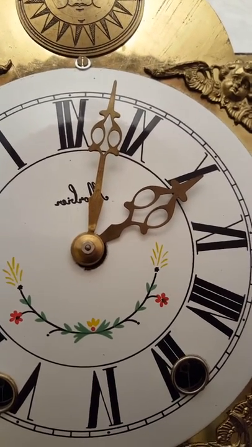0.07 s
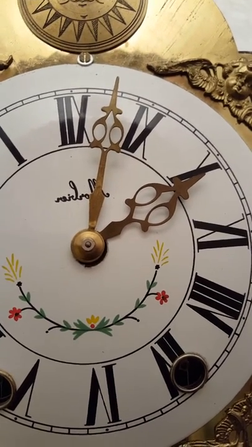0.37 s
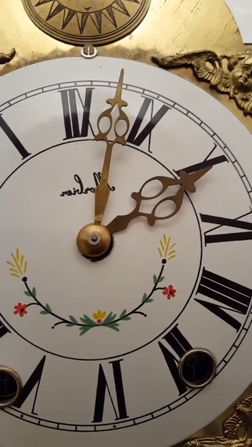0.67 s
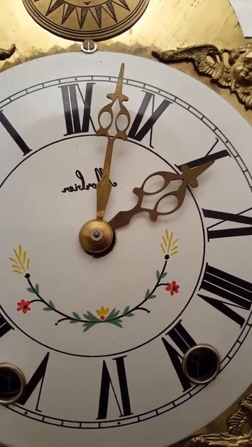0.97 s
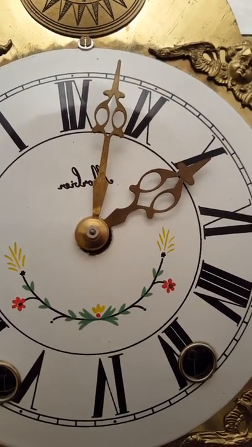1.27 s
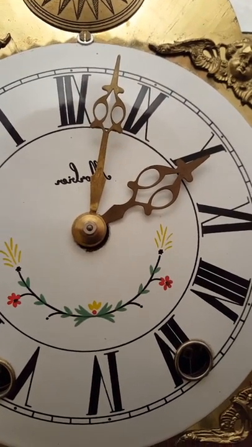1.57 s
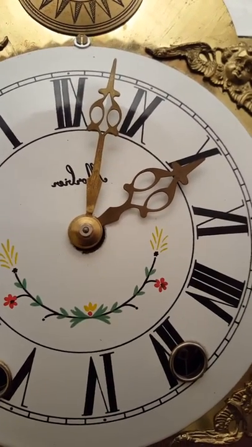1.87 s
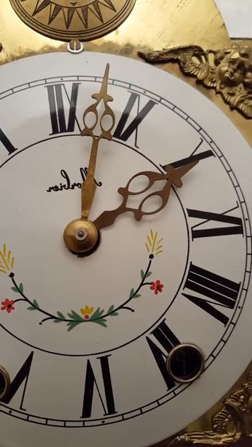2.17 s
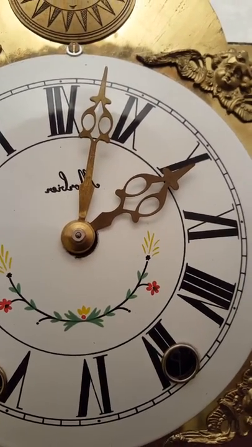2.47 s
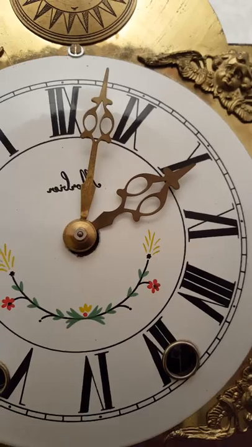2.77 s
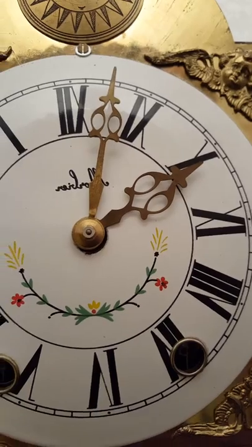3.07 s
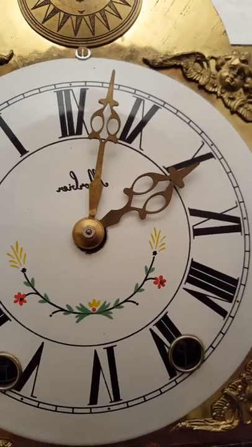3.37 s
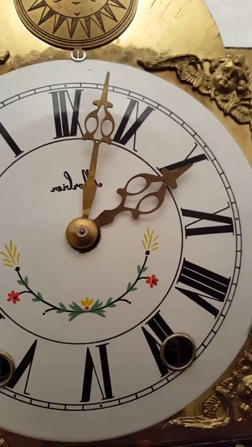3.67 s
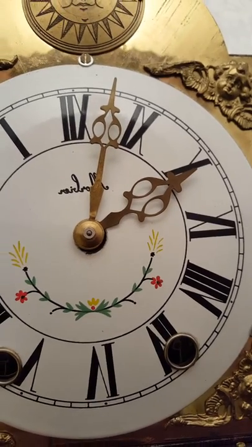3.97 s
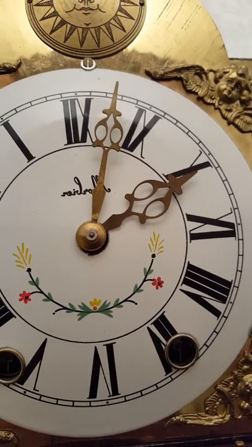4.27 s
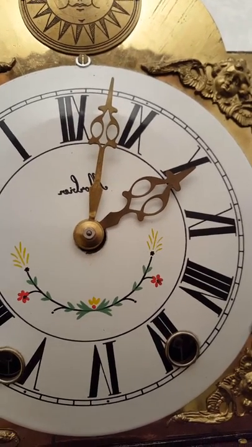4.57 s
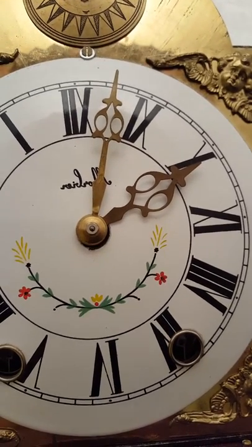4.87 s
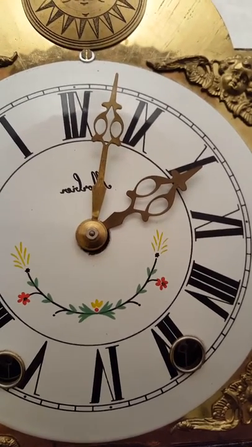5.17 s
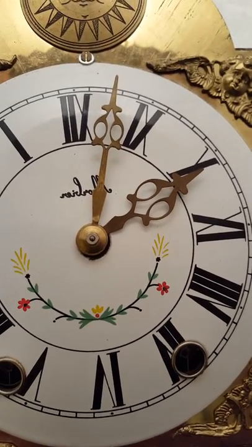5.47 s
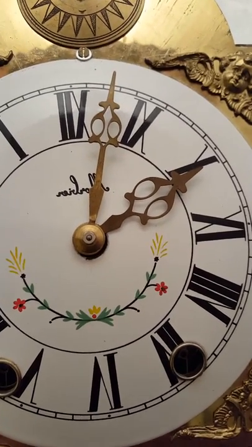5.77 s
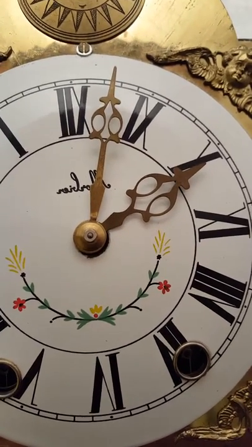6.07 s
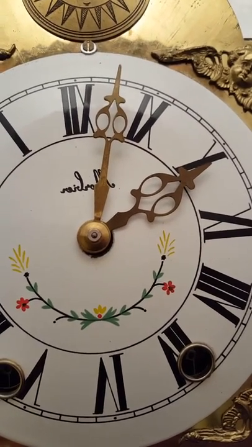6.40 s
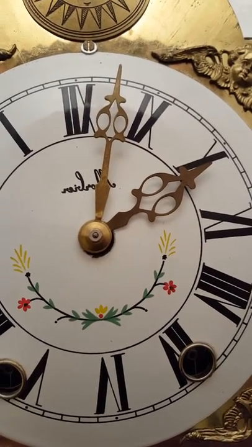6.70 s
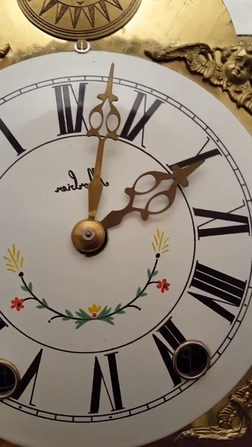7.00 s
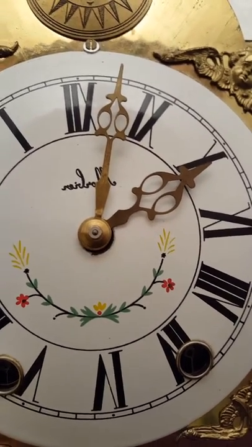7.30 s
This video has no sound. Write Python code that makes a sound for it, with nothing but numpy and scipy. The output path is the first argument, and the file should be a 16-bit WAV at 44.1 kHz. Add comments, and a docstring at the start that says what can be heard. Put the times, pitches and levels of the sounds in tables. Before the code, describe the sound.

In a quiet room with a faint rumble and hum, several mechanical clocks tick out of step. The nearest, a wall clock heard up close, beats slowly with a soft rub in its gears; behind it are a quick small clock, a hollow uneven one and a distant one. Late on, a light knock is followed by a loud rattle of metal parts as the mechanism releases, ringing briefly under the ticking.

```python
"""A pendulum wall clock ticks close by as its toothed wheel catches on two hooks in turn.
Its works rub softly around every tock, and near the end a lever lets go with a loud metal clatter.
Three other clocks tick more faintly around it, over a low room rumble and a thin hum.
Each hit is a burst of fading noise plus a few ringing tones."""
import sys
import numpy as np
from scipy import signal
from scipy.io import wavfile

SR = 44100
rng = np.random.default_rng(int(sys.argv[2]) if len(sys.argv) > 2 else 0)


def output_pcm(signal):
    """Save a mono or channel-first signal as 16-bit PCM at the path in sys.argv[1].

    Samples are clipped to [-1, 1] before scaling.
    """
    pcm = np.clip(np.atleast_2d(signal).T, -1, 1) * 32767
    wavfile.write(sys.argv[1], SR, np.round(pcm).astype(np.int16))


N = 323694
EDGES = np.geomspace(22, 17500, 39)   # borders of the frequency bands, in Hz
CENTRES = np.sqrt(EDGES[1:] * EDGES[:-1])
AGE = np.arange(int(.6 * SR)) / SR   # seconds since a hit began

# A small wooden knock before the lever lets go. Each row: start in seconds, level in dB.
KNOCK_HITS = [(6.5247, -51)]
# How hard the works stick at each tock. Each row: dB added to the rubs, dB added to the case's sway.
STICKING = [(-1, -7.5), (1, 2), (-0.5, -0.5), (-8.5, -24)]


def from_db(db):
    """Turn decibels into a factor to multiply by."""
    return 10 ** (np.asarray(db) / 20)


def rms(x):
    """The average strength of a signal (root mean square)."""
    return np.sqrt(np.mean(x ** 2) + 1e-24)


def attack_rms(x, size=1100):
    """The strength of the first samples of a stereo sound."""
    return rms(x[:, :size])


def per_band(points):
    """Read a table of (Hz, value) rows at the centre of each band."""
    hz, value = np.transpose(points)
    return np.interp(np.log(CENTRES), np.log(hz), value)


def shading(hz, treble_db, bass_db):
    """The dB added to the treble (above 2500 Hz) and to the bass (below 900 Hz)."""
    return treble_db * np.clip(np.log2(hz / 2500), 0, 1) + bass_db * np.clip(np.log2(900 / hz), 0, 1)


def noise_bands(size):
    """Stereo noise in narrow bands, shaped bands x 2 x size; the treble sounds wider than the bass."""
    # Stereo width. Each row: frequency in Hz, level of the side signal against the middle in dB.
    width = [(40, -26), (150, -7), (300, -6.5), (600, -7), (1100, 2.5), (3000, 0.5), (14000, 0)]
    white = rng.standard_normal((2, 2, size + SR // 8))
    bands = []
    for k, side_gain in enumerate(from_db(per_band(width))):
        band_filter = signal.butter(2, EDGES[k:k + 2], "band", fs=SR, output="sos")
        mid, side = signal.sosfilt(band_filter, white[k % 2])[:, -size:]
        bands.append([mid + side_gain * side, mid - side_gain * side])
    return np.array(bands)


def close_echoes(x, strength=0.42, count=2):
    """The dial and case walls throw the sound back within a millisecond or two."""
    for lag in (rng.uniform(.0006, .0022, count) * SR).astype(int):
        x = x + strength * np.pad(x[..., :-lag], [(0, 0), (0, 0), (lag, 0)])
    return x


def ringing(tones, since=AGE, spread=0.75):
    """One fading sine wave per tone; higher ones reach the two ears further out of step."""
    out = []
    for hz, db, t60 in tones:
        apart = min(hz / 1000, 1) * spread * rng.uniform(0.16, 1.59) * rng.choice([-1, 1])
        phase = 2 * np.pi * (hz * AGE + rng.random()) + apart * np.array([[1], [-1]])
        out.append(from_db(db - 60 * since / t60) * np.sin(phase))
    return np.array(out)


def add(out, s, sound):
    """Mix a sound in, starting at s seconds."""
    start = max(round(s * SR), 0)
    out[:, start:start + len(AGE)] += sound[:, :N - start]


def strike(hits, colour, tones, ring_db, chatter_s, rise_s, low_t60, high_t60, room_db, vary_db,
           pan_db=0):
    """A struck part gives noise and clear tones. A t60, or fade time, is the seconds to drop 60 dB."""
    # The room's echo. Each row: frequency in Hz, fade time in seconds.
    room_t60 = [(150, 1), (600, 1), (2500, 0.59), (6000, 0.42), (14000, 0.27)]
    body = close_echoes(noise_bands(len(AGE)))
    body *= (np.sqrt(np.diff(EDGES)) / [attack_rms(band, size=2200) for band in body])[:, None, None]
    since = np.hypot(AGE, chatter_s) - chatter_s   # the contact chatters briefly before the fade sets in
    near = from_db(-60 * since / per_band([(300, low_t60), (10000, high_t60)])[:, None])
    room = from_db(room_db - 60 * AGE / per_band(room_t60)[:, None])
    body *= np.hypot(near, room)[:, None]
    onset = 1 - np.exp(-AGE / rise_s)
    rings, tone_hz = ringing(tones, since), np.array(tones)[:, 0]
    rows = np.pad(np.array(hits), [(0, 0), (0, 5 - len(hits[0]))])   # missing columns count as 0
    out = np.zeros((2, N))
    for s, db, treble_db, side_db, bass_db in rows:
        # each hit has its own treble and bass, and no two are quite alike
        band_db = per_band(colour) + shading(CENTRES, treble_db, bass_db)
        band_db += vary_db * rng.standard_normal(len(CENTRES))
        tone_db = shading(tone_hz, treble_db, bass_db) + vary_db * rng.standard_normal(len(tones))
        noise = np.tensordot(from_db(band_db), body, axes=1)
        ring = np.tensordot(from_db(tone_db), rings, axes=1)
        hit = noise / attack_rms(noise) + from_db(ring_db) * ring / attack_rms(ring)
        add(out, s, onset * hit * from_db(db + (side_db + pan_db) * np.array([[.5], [-.5]])))
    return out


def repeat(cycle, period_s, uneven_db):
    """The beats of one cycle come round again and again, each stronger or weaker by about uneven_db."""
    turns = range(int(N / SR / period_s) + 1)
    beats = [(s + turn * period_s, db) for turn in turns for s, db in cycle]
    return [(s, db + uneven_db * rng.standard_normal()) for s, db in beats if s < N / SR]


def around(beats, pattern, strengths_db):
    """Place the same pattern of hits around each beat, with that swing's strength."""
    return [(s + after_s, db + swing_db, *tone)
            for (s, _), swing_db in zip(beats, strengths_db) for after_s, db, *tone in pattern]


def room_tone(air_db=-62, waver=0.18):
    """Low rumble, faint hiss and a hum whose tones waver a little."""
    # The room's noise, then its hum tones. Each row: frequency in Hz, level in dB.
    colour = [(24, -29.5), (40, -0.5), (81, -1), (104, -9), (155, -9.5), (220, -16.5), (503, -18),
              (615, -15), (663, -17), (1240, -25), (1410, -25), (1630, -24), (2630, -31.5), (3650, -34.5),
              (16000, -42)]
    hum = [(37.7, -70), (73, -80), (150, -80), (517, -80.5), (657, -78), (1362, -78), (2724, -86),
           (10869, -93.5)]
    air = np.tensordot(from_db(per_band(colour)), noise_bands(N), axes=1)
    out = from_db(air_db) * air / rms(air.mean(axis=0))
    t = np.arange(N) / SR
    for hz, db in hum:
        wander = np.interp(t, np.linspace(0, N / SR, 60), rng.standard_normal(60))
        out += np.sqrt(2) * from_db(db) * np.sin(2 * np.pi * hz * t + waver * wander)
    return out


def quick_clock():
    """A small, fast clock that stresses every fourth beat."""
    cycle = [(0.1713, -58.5), (0.4211, -61), (0.6709, -60), (0.9207, -60)]   # Each row: start in seconds, level in dB.
    colour = [(900, -3), (1600, -1), (2200, -10), (2700, -7), (3300, -3.5), (4200, -4), (5500, -3),
              (8000, -8.5), (11000, -14.5), (13500, -8.5), (16000, -10)]   # Each row: noise frequency in Hz, level in dB.
    tones = [(2670, -1.5, 0.097), (2880, -10.5, 0.19), (3311, -15, 0.21), (3600, -11.5, 0.064),
             (4010, -9.5, 0.17), (4330, -5, 0.089), (5470, -15, 0.12), (5380, -2.5, 0.063),
             (6340, -4.5, 0.11), (8360, -8.5, 0.066)]   # Each row: pitch in Hz, level in dB, fade time in seconds.
    return strike(repeat(cycle, period_s=.9992, uneven_db=0), colour, tones, ring_db=-5.5,
                  chatter_s=0.0046, rise_s=0.00071, low_t60=0.21, high_t60=0.12,
                  room_db=-19, vary_db=1.5, pan_db=-1.5)


def hollow_clock():
    """A hollow-sounding clock with a limping beat."""
    cycle = [(0.315, -52.5), (1.162, -51.5)]   # Each row: start in seconds, level in dB.
    colour = [(450, -23.5), (620, -18), (800, -28), (1000, -0.5), (1150, -5), (1400, -20.5), (2000, -20.5),
              (3500, -26.5), (7000, -35.5), (15000, -39)]   # Each row: noise frequency in Hz, level in dB.
    tones = [(950, -29, 0.29), (957, 2, 0.24), (1037, -1, 0.22), (1042.6, 11.5, 0.14), (1105, 5.5, 0.27)]   # Each row: pitch in Hz, level in dB, fade time in seconds.
    return strike(repeat(cycle, period_s=1.5751, uneven_db=0.2), colour, tones, ring_db=-4,
                  chatter_s=0.039, rise_s=0.00083, low_t60=0.23, high_t60=0.11,
                  room_db=-22, vary_db=4, pan_db=-2.5)


def faint_clock():
    """A clock ticking further away."""
    cycle = [(0.206, -63.5), (0.6475, -62)]   # Each row: start in seconds, level in dB.
    colour = [(900, -6), (1400, -3.5), (1900, 3), (2500, -5.5), (3300, -3), (4500, -19.5), (9000, -22.5)]   # Each row: noise frequency in Hz, level in dB.
    tones = [(1854, -1.5, 0.35), (1900, -8, 0.32), (2193, -5, 0.16), (2670, -4.5, .2)]   # Each row: pitch in Hz, level in dB, fade time in seconds.
    return strike(repeat(cycle, period_s=.938, uneven_db=1.5), colour, tones, ring_db=-8.5,
                  chatter_s=0.039, rise_s=0.0027, low_t60=0.36, high_t60=0.16, room_db=-23, vary_db=5)


def rubbing_works(tocks, slide_s=0.12, slide_db=-7):
    """The works rub as the pendulum swings out and back; a loose part slides before it knocks."""
    rubs = [(-0.128, -54, -3.5), (0.092, -52.5, -1.5), (0.146, -59.5, 4)]   # Each row: seconds after the tock, level in dB, extra treble in dB.
    colour = [(220, -4), (320, 4.5), (430, -2.5), (540, -17), (720, -1), (1000, -3.5), (1400, -3.5),
              (1750, -5), (2200, -13), (4500, -22), (6200, -13.5), (10000, -24.5), (12500, -15),
              (16000, -36)]   # Each row: noise frequency in Hz, level in dB.
    tones = [(323, -6.5, 0.24), (366.7, -1, 0.3), (450.6, 1, 0.96), (454, -12.5, 0.66), (588, -5.5, 0.49),
             (640, -0.5, 0.46), (1010, -17, 0.15), (1400, -16, 0.33), (1734, -7, 0.26), (1750, -0.5, 0.47)]   # Each row: pitch in Hz, level in dB, fade time in seconds.
    hits = around(tocks, rubs, [rub_db for rub_db, _ in STICKING])
    hits += [(s - slide_s, db + slide_db, 0) for s, db in KNOCK_HITS]
    return strike(hits, colour, tones, ring_db=-3.5, chatter_s=0.019, rise_s=0.0048,
                  low_t60=0.25, high_t60=0.66, room_db=-5.5, vary_db=1.1, pan_db=-2.5)


def case_thuds(tocks):
    """The case gives as the rubbing starts, and jolts around the time the lever lets go."""
    sway = [(-0.124, -58), (-0.075, -63)]   # Each row: seconds after the tock, level in dB.
    jolts = [(6.451, -64), (6.957, -47), (6.977, -44.5), (7.012, -44.5), (7.08, -52.5), (7.234, -59.5)]   # Each row: start in seconds, level in dB.
    colour = [(25, -45), (60, -10), (110, -3.5), (155, -0.5), (210, -18), (290, -10.5), (420, -7),
              (700, -32.5), (2000, -63.5)]   # Each row: noise frequency in Hz, level in dB.
    tones = [(157.7, -2, 0.46), (372.6, -5, 0.22)]   # Each row: pitch in Hz, level in dB, fade time in seconds.
    hits = around(tocks, sway, [sway_db for _, sway_db in STICKING]) + jolts
    return strike(hits, colour, tones, ring_db=6, chatter_s=0.028, rise_s=0.014,
                  low_t60=0.46, high_t60=.1, room_db=-20, vary_db=2, pan_db=-1.5)


def wooden_knock():
    """A loose part knocks once."""
    colour = [(300, -13.5), (500, -12), (660, -2), (850, -12), (1300, -20), (2500, -28.5), (9000, -38)]   # Each row: noise frequency in Hz, level in dB.
    tones = [(550, -8, 0.23), (630, -2.5, 0.16), (950, -11, 0.089)]   # Each row: pitch in Hz, level in dB, fade time in seconds.
    return strike(KNOCK_HITS, colour, tones, ring_db=-2, chatter_s=0.0097, rise_s=0.0028,
                  low_t60=0.17, high_t60=.1, room_db=-19, vary_db=2.2, pan_db=-4)


def lever_release():
    """Metal parts clatter, with the lever's ringing clink among the first hits, and the frame rings on."""
    # Each row: start in seconds, then level, extra treble, left minus right and extra bass, all in dB.
    clatter = [(6.8975, -39.5, -6, -3, 9), (6.9285, -35.5, -4, -3.5, -1), (6.9555, -34, -3.5, -5, 9.5),
               (6.9815, -22, 3.5, -2.5, -2), (7.0395, -28, 6, -1, -1.5), (7.0735, -34, 4.5, -3, -4)]
    clink = [(6.9294, -34)]   # Each row: start in seconds, level in dB.
    # The noise of the hits. Each row: frequency in Hz, level in dB.
    clatter_colour = [(100, -16), (150, -5), (220, -10), (280, 3.5), (430, -3), (520, -3.5), (1100, 0),
                      (1500, -2), (2700, 1.5), (4900, -12), (8000, -5), (9100, 0.5), (11000, -8.5),
                      (14200, -3.5), (16000, -25.5)]
    lever_colour = [(700, -24), (1000, -5), (1200, 1.5), (1500, -35), (2000, -27), (4000, -2),
                    (6000, -19.5)]
    # The ringing metal. Each row: pitch in Hz, level in dB, fade time in seconds.
    clatter_tones = [(278.6, -5.5, 0.66), (331, -8, 0.3), (385, -13.5, 0.3), (446.4, -7, 0.56),
                     (842.4, -5.5, 0.5), (1620, -17, 0.41), (1935, 1.5, 0.18), (2030, -5.5, 0.2),
                     (2560, 0.5, 0.27), (2690, -4.5, 0.15), (2813, -6, 0.16), (4160, -10.5, 0.17),
                     (5711, -7, 0.17), (6450, -9.5, 0.16), (7170, -8, .18), (8780, 5, 0.12),
                     (9190, 4, 0.11), (9900, -14, 0.11)]
    lever_tones = [(851, -12.5, 0.24), (1117, -4, .15), (1166, 2, 0.13), (1200, 0, 0.14), (1586, -11, 0.18),
                   (1964, -6, 0.14), (3130, -16, 0.16), (3700, -12, .13)]
    frame_tones = [(285, -60, 0.69), (424, -54, 0.9), (549, -52, 0.79), (656, -41.5, 1.03),
                   (3250, -59, 1.6)]
    out = strike(clatter, clatter_colour, clatter_tones, ring_db=-5.5, chatter_s=0.011, rise_s=0.00075,
                 low_t60=0.31, high_t60=0.13, room_db=-16.5, vary_db=1.2)
    out += strike(clink, lever_colour, lever_tones, ring_db=5.5, chatter_s=0.0069, rise_s=0.0013,
                  low_t60=0.29, high_t60=0.18, room_db=-13, vary_db=1.1, pan_db=0.5)
    hardest_hit_s = max(clatter, key=lambda row: row[1])[0]
    add(out, hardest_hit_s, ringing(frame_tones).sum(axis=0))
    return out


def wall_clock(period_s=1.7088):
    """A toothed wheel drops onto two hooks in turn, tick and tock, while the works rub and thud."""
    # The first beat on each hook. Each row: start in seconds, level in dB.
    first_tick = [(0.012, -45)]
    first_tock = [(0.8595, -45)]
    # The noise of the beats. Each row: frequency in Hz, level in dB.
    tick_colour = [(130, -22), (240, -10), (370, -8.5), (520, -1), (850, -3.5), (1250, -6.5), (1750, -7),
                   (2150, -20.5), (2450, 3.5), (3050, -24), (3700, -9), (5500, -22), (12000, -18),
                   (16000, -21)]
    tock_colour = [(130, -19), (240, -15.5), (420, -2), (620, -8), (900, -4.5), (1250, -8.5), (1650, -6),
                   (2200, -16.5), (2450, -8), (3000, -19), (5500, -20), (6500, -17), (7800, -24),
                   (12500, -23), (16000, -33)]
    # Their ringing. Each row: pitch in Hz, level in dB, fade time in seconds.
    tick_tones = [(372, -2.5, 0.25), (459, -5.5, 0.45), (503, -11.5, 0.68), (530.7, -6.5, 0.25),
                  (615, -7.5, 0.38), (658, -14, 0.28), (710, -13.5, 0.28), (718, -6, 0.23),
                  (861.6, 5, 0.17), (914, -6, 0.27), (1093, -33, 0.16), (1109, -13.5, 0.4),
                  (1280, -25, 0.34), (1360, -6.5, 0.17), (1650, -5, 0.15), (1750, -11, 0.12),
                  (1810, -12, 0.27), (1880, -5.5, 0.22), (1890, -26, 0.16), (1930, -11.5, 0.13),
                  (2270, -42, 0.208), (2410, -8, 0.17), (2510, -3.5, 0.11), (3880, -11, 0.12),
                  (3957, -27, 0.27), (4807, -18.5, 0.1)]
    tock_tones = [(342, -5.5, 0.13), (392, -13, 0.25), (437.8, 6.5, 0.19), (474, -9, 0.55),
                  (549, -19, 0.24), (790, -46.5, 0.33), (826, 5.5, 0.23), (892, 0.5, 0.21), (939, 3, 0.12),
                  (980, -15, 0.25), (1410, -14, 0.34), (1490, -24, 0.34), (1755, -10, 0.1),
                  (1900, -36.5, 0.37), (2480, -2, 0.15), (2580, -41, 0.093), (3390, -10.5, 0.14),
                  (4810, -10, 0.092), (6541, -6.5, 0.14), (8250, -17, 0.13)]
    ticks = repeat(first_tick, period_s, uneven_db=0.22)
    tocks = repeat(first_tock, period_s, uneven_db=0.56)
    tick = strike(ticks, tick_colour, tick_tones, ring_db=0, chatter_s=0.02, rise_s=0.0018,
                  low_t60=0.31, high_t60=0.1, room_db=-21.5, vary_db=1.5, pan_db=-2.5)
    tock = strike(tocks, tock_colour, tock_tones, ring_db=1.5, chatter_s=0.0058, rise_s=0.0042,
                  low_t60=0.25, high_t60=0.1, room_db=-18, vary_db=0.6, pan_db=-3)
    return tick + tock + rubbing_works(tocks) + case_thuds(tocks) + wooden_knock()


def scene():
    """All the clocks in their room."""
    return wall_clock() + quick_clock() + hollow_clock() + faint_clock() + lever_release() + room_tone()


def record(dry, left_db=1.0, low_cut_hz=31.5, high_cut_hz=16000):
    """The microphones favour the left a little and lose the deepest bass and the highest treble."""
    heard = dry * from_db(left_db * np.array([[.5], [-.5]]))
    heard = signal.sosfilt(signal.butter(4, low_cut_hz, "high", fs=SR, output="sos"), heard)
    return signal.sosfilt(signal.ellip(12, .1, 80, high_cut_hz, fs=SR, output="sos"), heard)


dry = scene()
out = record(dry)
output_pcm(out)
```